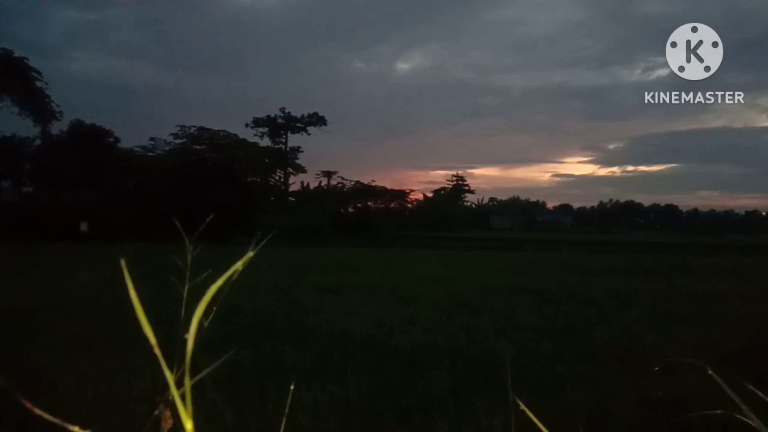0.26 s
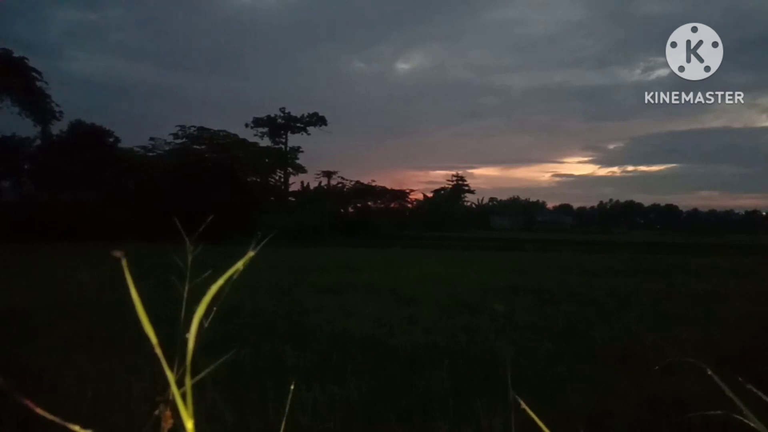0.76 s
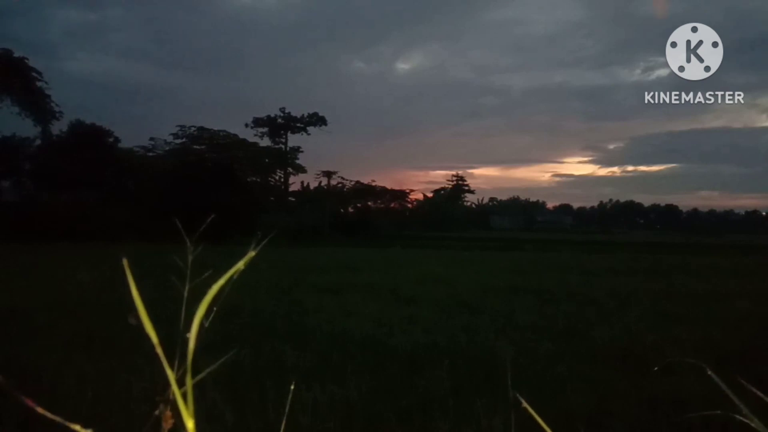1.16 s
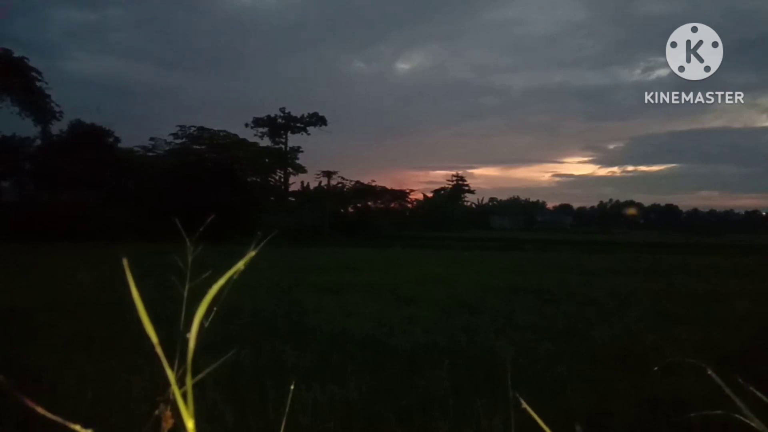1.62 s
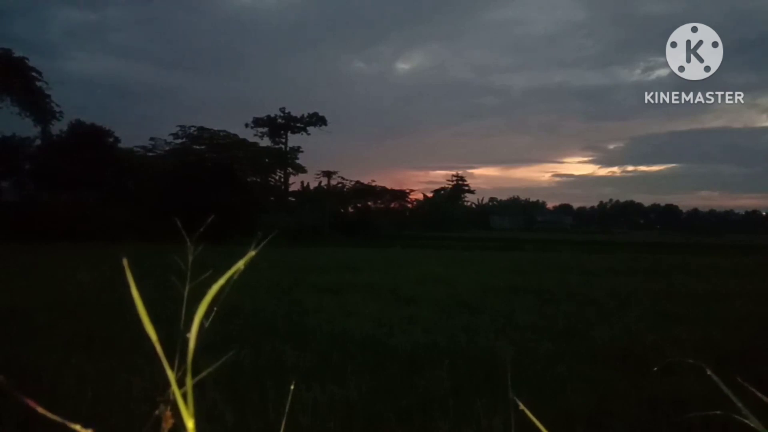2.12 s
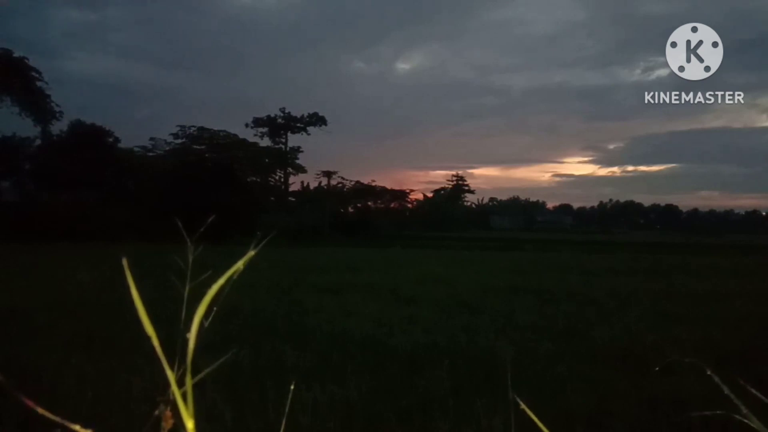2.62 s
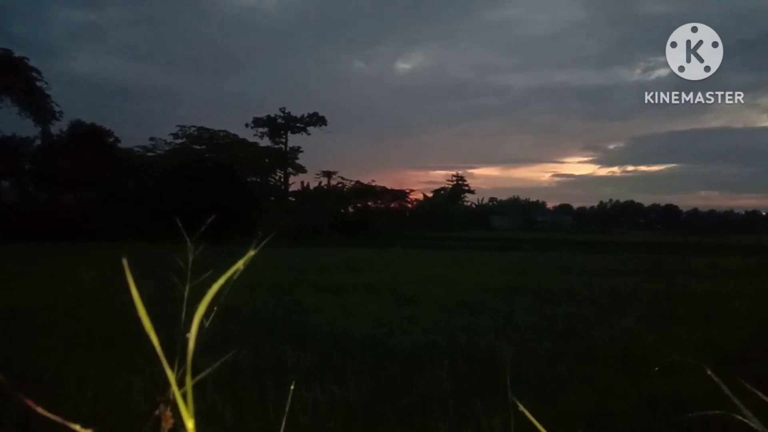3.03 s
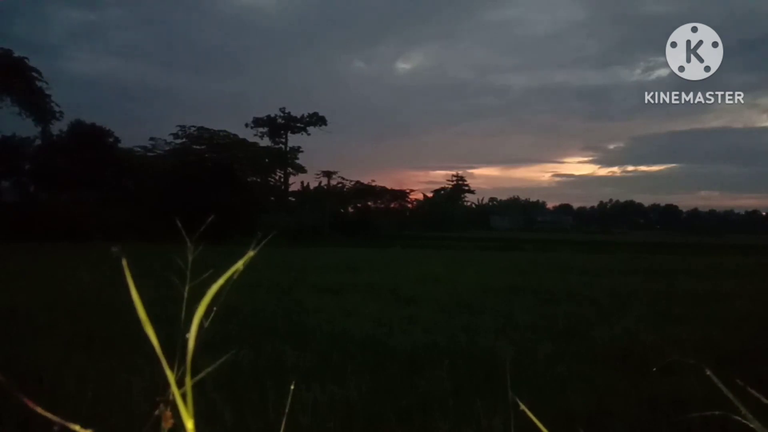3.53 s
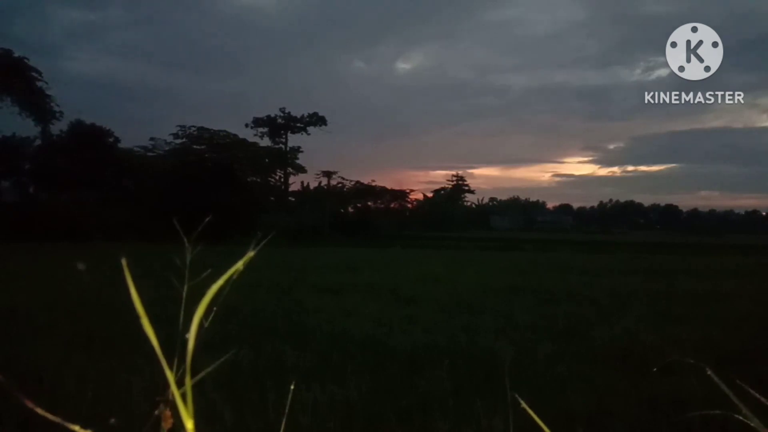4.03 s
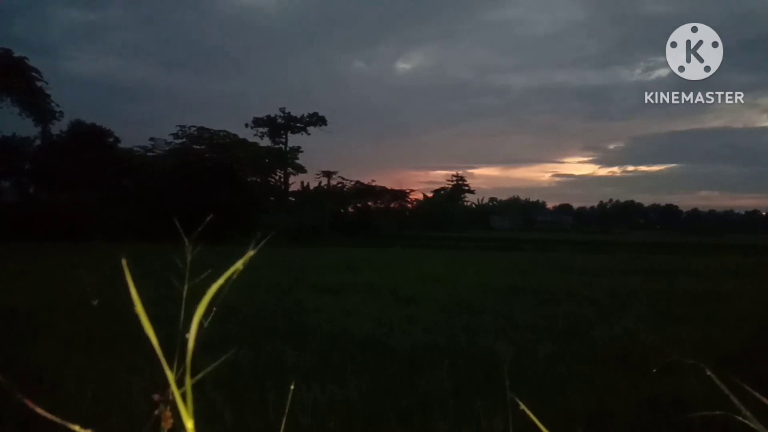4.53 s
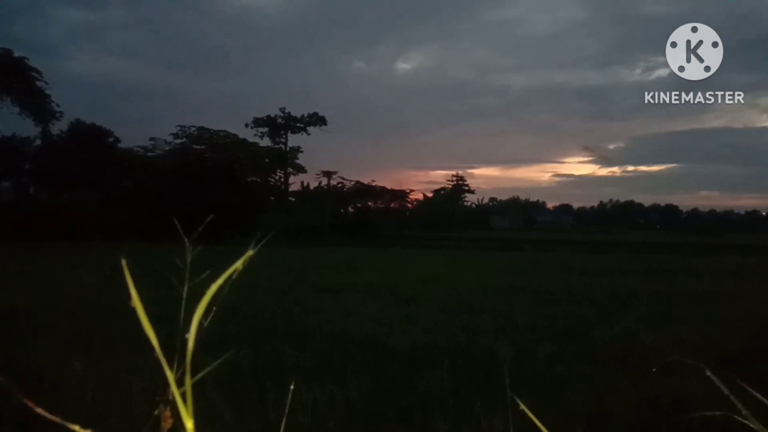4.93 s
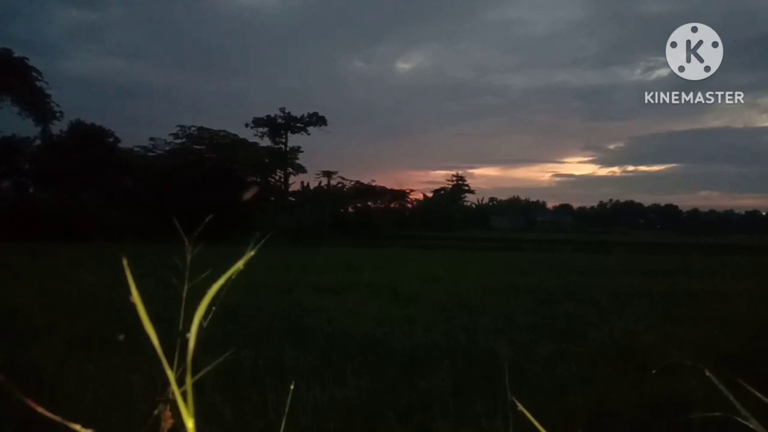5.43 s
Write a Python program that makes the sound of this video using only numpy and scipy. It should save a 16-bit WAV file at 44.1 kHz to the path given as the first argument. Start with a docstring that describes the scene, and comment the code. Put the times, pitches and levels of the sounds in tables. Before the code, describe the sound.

Night is falling over open fields edged by trees. From the start a near owl trills low, around 540 Hz, in short pure whistles that each sag in pitch; the pace is quick, slows slightly, then quickens until about 2.6 s. A near cricket gives four bright chirps between 0.3 and 1.1 s. From 1.7 to 2.7 s a second owl overlaps with eight higher notes, growing from faint to strong, rising then levelling, with echoes off the trees. At 3.3 s a dry grass tick snaps and that owl gives a long hoot, scooping up, gliding slowly down and wavering before dropping away by 4.1 s. A small frog peeps near 0.6, 1.7, 2.75, 3.8 and 4.8 s; a thin high whistle joins at 3.8. Faint cricket buzzes follow from 3.6 to 4.9 s. Two tiny ticks and a faint, echo-blurred far owl come after 5.3 s. Distant insects and frogs shimmer throughout over soft air and low rumble.

```python
"""A near owl trills on a low note at dusk over open fields, in short whistles that each sag in pitch.
A second owl answers with a rising trill that the tree line throws back, then a long gliding hoot;
a third whistles far away, half lost in its echo. Crickets chirp in bursts of sliding wing strokes,
a frog peeps about once a second, and the grass ticks. Noise and flickering whistles make the distant
chorus of insects and frogs, over a lumpy low rumble."""
import sys
import numpy as np
from scipy import signal
from scipy.io import wavfile
from scipy.ndimage import uniform_filter1d, map_coordinates

SR = 44100
rng = np.random.default_rng(int(sys.argv[2]) if len(sys.argv) > 2 else 0)


def dump(signal):
    """Clip the signal to [-1, 1] and save it as 16-bit WAV at the path in sys.argv[1]."""
    limited = np.clip(np.atleast_2d(signal).T, -1, 1)
    pcm = np.round(limited * 32767).astype(np.int16)
    wavfile.write(sys.argv[1], SR, pcm)


def voltage_ratio(level):
    """Linear amplitude factor for a level in decibels (scalar or array-like)."""
    return 10 ** (np.asarray(level, float) / 20)


N = 249606


def evened(x):
    """Scale a sound to rms 1."""
    return x / np.sqrt(np.mean(x ** 2) + 1e-20)


def add(mix, start_s, sound):
    """Lay a sound into the mix, trimmed at both ends of the scene."""
    at = round(start_s * SR)
    part, sound = mix[max(at, 0):], sound[max(-at, 0):]
    part[:len(sound)] += sound[:len(part)]


def slow(rate_hz):
    """Smooth random drift: chance values at the given rate, joined by a spline, rms 1."""
    knots = rng.standard_normal(2000)
    return evened(map_coordinates(knots, [np.arange(N) * rate_hz / SR], order=3))


def band(x, hz, width):
    """A steep band-pass."""
    edges = [hz - width / 2, hz + width / 2]
    return signal.sosfilt(signal.butter(2, edges, "band", fs=SR, output="sos"), x)


def coloured(points, patchy_db):
    """Noise of a given spectrum whose level drifts in patches of time and pitch."""
    frames, hz = N // 256 + 5, np.fft.rfftfreq(1024, 1 / SR)
    real, imaginary, patches = rng.standard_normal((frames, 513, 3)).T
    patches = uniform_filter1d(patches, size=10, axis=0)  # blur over pitch
    patches = evened(uniform_filter1d(patches, size=12, axis=1))  # blur over time
    f, db = np.transpose(points)
    shape_db = np.interp(np.log(hz + 1), np.log(f), db)[:, None]
    spectrum = (real + 1j * imaginary) * voltage_ratio(shape_db + patchy_db * patches)
    return evened(signal.istft(spectrum, nperseg=1024, noverlap=768)[1][:N])


def tail(x, t60, gap):
    """Scattered sound from the fields: dying noise that starts after a gap, energy 1."""
    t = np.arange(3 * SR) / SR
    taps = rng.standard_normal(len(t)) * voltage_ratio(-60 * t / t60) * (t > gap)
    return signal.fftconvolve(x, taps / np.linalg.norm(taps))[:N]


def note(length, peak_at, rise, fall):
    """Place in the note (-1 start, 1 end, running over both) and its rounded envelope."""
    u = np.arange(-.4, 1.6, 1 / (SR * length))
    before = (abs(u - peak_at) / peak_at) ** rise
    after = (abs(u - peak_at) / (1 - peak_at)) ** fall
    return 2 * u - 1, voltage_ratio(-8 * np.where(u < peak_at, before, after))


def tone(hz, second_db):
    """A nearly pure whistle with a second partial."""
    phase = 2 * np.pi * (np.cumsum(hz) / SR + rng.random())
    return np.sin(phase) + voltage_ratio(second_db) * np.sin(2 * phase)


def glide(rows, second_db):
    """One held note along curves of pitch and level."""
    s, hz, db = np.transpose(rows)
    t = np.arange(s[0], s[-1], 1 / SR)
    hz = uniform_filter1d(np.interp(t, s, hz), size=800, mode="nearest")
    edge = np.minimum(1, np.minimum(t - s[0], s[-1] - t) / 0.0054)
    level = np.sqrt(2) * voltage_ratio(np.interp(t, s, db))  # the curve is in rms dB
    return s[0], level * edge * tone(hz, second_db)


# Near owl's tempo, quick, then slow, then quick again. Each row: time in seconds, gap to the next note
# in seconds.
LOW_TEMPO = [(0, .0763), (.161, .0783), (.819, .0714), (.904, .0868), (1.188, .1022), (1.828, .0984),
             (2.094, .075), (2.159, .0698), (2.45, .0719)]
# Near owl's effort. Each row: time in seconds, peak level in dB, pitch in Hz; notes scatter around both.
LOW_EFFORT = [(0, -16.5, 540), (.5, -14, 540), (1, -14.7, 538.5), (1.8, -14, 539.4), (2.1, -13.3, 543),
              (2.45, -15.5, 546)]
LOW_START_S, LOW_NOTES = .001, 30
LOW_DUTY = .47  # note length at 8 dB down over its gap
HISS_ENDS_S = 2.73


def near_owl():
    """Short notes that each sag in pitch, with a little breath above them and a soft hiss around."""
    out, s = np.zeros(N), LOW_START_S
    at, effort_db, pitch_hz = np.transpose(LOW_EFFORT)
    for uneven_db, uneven_hz in rng.standard_normal((LOW_NOTES, 2)) * (.55, 1.5):
        gap = np.interp(s, *np.transpose(LOW_TEMPO))
        length = LOW_DUTY * gap
        db = np.interp(s, at, effort_db) + uneven_db
        hz = np.interp(s, at, pitch_hz) + uneven_hz
        v, env = note(length, .41, 3.2, 2.7)
        sagging_hz = hz - 400 * length * v - 8 * v ** 2
        add(out, s - .4 * length, voltage_ratio(db) * env * tone(sagging_hz, -35))
        s += gap
    effort = uniform_filter1d(abs(out), size=6000)
    breath = effort * evened(band(rng.standard_normal(N), 683, 175)) * voltage_ratio(2.0 * slow(24.5))
    hiss = evened(band(rng.standard_normal(N), 580, 280)) * (np.arange(N) < HISS_ENDS_S * SR)
    echo = voltage_ratio(-22) * tail(out, .5, .01)
    return out + echo + voltage_ratio(-20.0) * breath + voltage_ratio(-48.5) * hiss


def species(hz, width, db, rate, depth_db, count=7):
    """A few singers on nearby pitches whistle on and off over the blur of all the farther ones."""
    t = np.arange(N) / SR
    singers = np.zeros(N)
    for own_hz in hz + width * (np.arange(count) + rng.random(count) - count / 2) / count:
        throb = voltage_ratio(depth_db * slow(rate))
        singers += throb * np.sin(2 * np.pi * own_hz * t + 2.52 * slow(rate))
    blur = band(rng.standard_normal(N), hz, width) * voltage_ratio(1.96 * slow(rate))
    return voltage_ratio(db) * evened(.7 * evened(singers) + evened(blur))


# Distant chorus, one species a row, frogs first. Each row: centre in Hz, width in Hz, level in dB,
# rate of the random throb in Hz, depth of the throb in dB rms.
CHORUS = [(1581, 220, -48.5, 14, 5.5), (2808, 310, -50, 12, 4), (3240, 240, -44.5, 14, 5),
          (4760, 670, -41.5, 28, 5.5), (5863, 620, -38.5, 30, 3.5), (8165, 1100, -46, 35, 8)]
LULL_AT_S, LULL_EVERY_S, LULL_DB, LULL_SHARP, WANDER_DB = 0.46, 1.066, -3.5, 2.4, 1


def chorus():
    """Frogs in the three low bands sink together about once a second; the insects above hold steady."""
    lull = np.cos(np.pi * (np.arange(N) / SR - LULL_AT_S) / LULL_EVERY_S) ** 2
    swell = evened(voltage_ratio(LULL_DB * lull ** LULL_SHARP + WANDER_DB * slow(4.625)))
    low, middle, high, *insects = (species(*row) for row in CHORUS)
    return swell ** 0.67 * low + swell * (middle + high) + sum(insects)


def rumble():
    """A low hum of narrow-band noise that comes in lumps."""
    lumps = voltage_ratio(3.5 * slow(6.))
    return voltage_ratio(-61.5) * evened(band(rng.standard_normal(N), 78, 26) * lumps)


# Spectrum of the open air. Each row: frequency in Hz, relative level in dB per Hz.
AIR = [(20, -20.5), (50, -10.5), (85, -4.5), (200, -5.5), (450, -9.5), (800, -7.5), (1200, -11),
       (2000, -8.5), (4000, -2), (7000, -6.5), (9300, -10), (10500, -17.5), (15400, -18), (15800, -48.5)]


def open_air():
    """A broad bed of patchy noise in the middle."""
    return voltage_ratio(-38) * coloured(AIR, 1.82)


# Spectrum of the left-right difference. Each row: frequency in Hz, relative level in dB per Hz.
WIDE = [(20, -38), (110, -9), (300, -6), (800, -18), (1500, -24), (3800, -28), (4300, 2), (4900, 2),
        (5300, -14), (6200, -8), (6600, 2), (7100, -24), (9500, -21), (15500, -23)]


def side_noise():
    """Patchy left-right noise, strongest near 4.6 and 6.5 kHz, pulsing about 4.3 times a second."""
    beat = 2 * np.pi * 4.3 * np.arange(N) / SR + slow(0.84)
    return voltage_ratio(-49.5) * voltage_ratio(2.2 * np.sin(beat)) * coloured(WIDE, 4)


def stroke(length, top_hz, drop_hz):
    """One wing stroke: a whistle that slides down ever faster as the ridges on the wing run out."""
    u = np.arange(0, 1, 1 / (SR * length))
    flutter = voltage_ratio(2.5 * np.sin(2 * np.pi * (2 * u + rng.random())))
    return np.sin(np.pi * u ** .8) ** .7 * flutter * tone(top_hz - drop_hz * u ** 1.7, -40)


# Near cricket, one chirp a row. Each row: start in seconds, count of wing strokes, level in dB.
CHIRPS = [(.342, 4, -21.7), (.595, 3, -20.5), (.81, 3, -21), (1.021, 3, -20.7)]
# Second cricket, one buzz a row. Each row: start in seconds, length in seconds, level in dB.
BUZZES = [(3.575, .05, -29.5), (3.795, .075, -28.5), (4.06, .065, -29.5), (4.305, .09, -30.5),
          (4.595, .07, -27.5), (4.9, .05, -27.5)]
STROKE_GAP_S, FIRST_STROKE_DB = .0335, -2.5  # the first stroke is softer
BUZZ_STROKES_HZ = 109


def crickets():
    """Chirps of three or four strokes from the near one, fast buzzes from the other; one close echo."""
    out = np.zeros(N)
    for s, strokes, db in CHIRPS:
        for k, (late, uneven) in enumerate(rng.standard_normal((strokes, 2))):
            level_db = db + FIRST_STROKE_DB * (k == 0) + 0.93 * uneven
            at = s - .003 + k * STROKE_GAP_S + .001 * late  # the soft onset leads by 3 ms
            add(out, at, voltage_ratio(level_db) * stroke(.021, 5120, 800 + 60 * late))
    for s, length, db in BUZZES:
        for at in np.arange(0, length, 1 / BUZZ_STROKES_HZ):
            swell = np.sin(np.pi * (at + .008) / (length + .012)) ** .5
            level_db = db + 1.5 * rng.standard_normal()
            add(out, s + at, voltage_ratio(level_db) * swell * stroke(.008, 5150, 1000))
    heard = out + voltage_ratio(-8) * tail(out, .22, .004)
    add(heard, .017, voltage_ratio(-11) * out)
    return heard


# Frog, one peep a row. Each row: start in seconds, length in seconds at 8 dB down, peak level in dB.
PEEPS = [(.63, .115, -29), (1.7, .12, -27.5), (2.75, .12, -27), (3.8, .125, -27), (4.815, .145, -27.5)]
# One thin high whistle: start in seconds, length in seconds at 8 dB down, peak level in dB, pitch in Hz.
THIN_PEEP = (3.805, .145, -35, 5495)
PEEP_HZ, PEEP_HALF_DB = 2942, -12.5  # loud partial, level of the partial at half the pitch


def peeps():
    """Steady whistles that sag a little; the frog's has a weak partial at half the pitch."""
    out = np.zeros(N)
    frog = [(s, length, db, PEEP_HZ, PEEP_HALF_DB) for s, length, db in PEEPS]
    thin = tuple(THIN_PEEP) + (-40,)
    for s, length, db, hz, half_db in frog + [thin]:
        v, env = note(length, .36, 1.5, 1.6)
        # the tone runs at half the pitch, so its second partial is the loud one
        whistle = tone(hz / 2 * (1 - .006 * v), -half_db)
        add(out, s - .4 * length, voltage_ratio(db + half_db) * env * whistle)
    return out + voltage_ratio(-13) * tail(out, 1.2, .01)


# Second owl's trill, one note a row. Each row: start in seconds, peak level in dB, top pitch in Hz.
HIGH_TRILL = [(1.718, -31, 760), (1.856, -18.2, 795), (1.978, -12.8, 828), (2.111, -12, 848),
              (2.244, -12.5, 872), (2.378, -13, 862), (2.512, -12.3, 852), (2.658, -12.3, 850)]
# Slaps off the tree line. Each row: delay in seconds, level in dB.
ECHOES = [(.084, -15), (.17, -22)]
HIGH_NOTE_S, SOFT_NOTE_S, SOFT_DB = .065, .038, -15  # notes under SOFT_DB are short
BEND_FROM_HZ, LEAST_BEND_HZ = 812, 25  # the higher notes bend up from about the same pitch


def second_owl_trill():
    """Notes that arch in pitch, with slaps off the trees and a long tail."""
    out = np.zeros(N)
    for s, db, hz in HIGH_TRILL:
        length = SOFT_NOTE_S if db < SOFT_DB else HIGH_NOTE_S
        arch_hz = max(LEAST_BEND_HZ, hz - BEND_FROM_HZ)
        v, env = note(length, .42, 3.4, 4.5)
        bend = np.where(v < .3, (abs(v - .3) / 1.1) ** 1.5, (abs(v - .3) / .7) ** 2)
        add(out, s - .4 * length, voltage_ratio(db) * env * tone(hz - arch_hz * bend, -50))
    heard = out + voltage_ratio(-16) * tail(out, 3.5, .06)
    for delay, db in ECHOES:
        add(heard, delay, voltage_ratio(db) * out)
    return heard


# Second owl's long hoot, points along one glide. Each row: time in seconds, pitch in Hz, level in dB rms.
HOOT = [(3.285, 609, -48.5), (3.331, 743, -20.5), (3.362, 806, -13.5), (3.429, 830, -8.5), (3.497, 823, -9),
        (3.751, 804, -13), (3.899, 771.5, -15), (3.999, 683, -29), (4.1, 567, -49.5)]
# the level wavers late in the hoot, and the waver dies away
WAVER_S, WAVER_HZ, WAVER_DB, WAVER_FADE_S = 3.775, 19.84, 5, 0.22


def second_owl_hoot():
    """A long hoot aimed over open ground: no slaps, only a tail that flutters in the air."""
    hoot = np.zeros(N)
    add(hoot, *glide(HOOT, -53.0))
    since = np.maximum(np.arange(N) / SR - WAVER_S, 0)
    waver = np.exp(-since / WAVER_FADE_S) * np.sin(2 * np.pi * WAVER_HZ * since)
    hoot *= voltage_ratio(WAVER_DB * waver)
    return hoot + voltage_ratio(-16.5 + 2.5 * slow(45)) * tail(hoot, 1.55, .08)


# Dry ticks in the grass. Each row: start in seconds, peak level in dB, centre in Hz, width in Hz,
# decay by 60 dB in seconds.
TICKS = [(3.3297, -13, 5800, 5200, .018), (5.2775, -21, 13800, 3500, .004),
         (5.3082, -25, 13300, 3500, .004)]


def ticks():
    """A snap with a few ms of crackle: dying noise, band-passed twice."""
    out, t = np.zeros(N), np.arange(800) / SR
    for s, db, hz, width, t60 in TICKS:
        crackle = rng.standard_normal(len(t)) * voltage_ratio(-60 * t / t60)
        snap = band(band(crackle, hz, width), hz, width)
        add(out, s, voltage_ratio(db) * snap / abs(snap).max())
    return out


# Far owl, one list of points a note. Each row: time in seconds, pitch in Hz, level in dB rms.
FAR_OWL = [
    [(5.325, 875, -49), (5.358, 890, -30), (5.372, 895, -47)],
    [(5.36, 1050, -40), (5.41, 1015, -42), (5.45, 1021, -33), (5.51, 1037, -41), (5.522, 1050, -53),
     (5.54, 1023, -33), (5.61, 1104, -40.5), (5.635, 1130, -40)],
    [(5.635, 854, -45), (5.66, 876, -33)],
]


def far_owl():
    """A stepped whistle, half lost in its own echo."""
    out = np.zeros(N)
    for rows in FAR_OWL:
        add(out, *glide(rows, -28))
    return out + voltage_ratio(-9) * tail(out, .8, .02)


def scene():
    """Every voice sits in the middle; the side noise is added on the left and taken off on the right."""
    mid = near_owl() + chorus() + rumble() + open_air() + crickets() + peeps()
    mid += second_owl_trill() + second_owl_hoot() + ticks() + far_owl()
    side = side_noise()
    return np.array([mid + side, mid - side])


def top_cut(x):
    """Nothing passes above the cut-off."""
    return signal.sosfilt(signal.butter(12, 16160, fs=SR, output="sos"), x)


def record(dry):
    """Turn the dry stereo mix into the finished sound."""
    return top_cut(dry)


dry = scene()
out = record(dry)
dump(out)
```